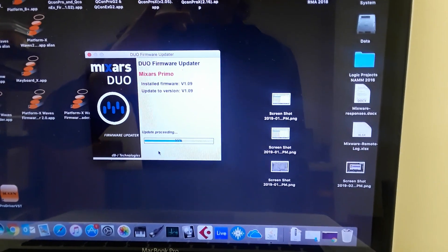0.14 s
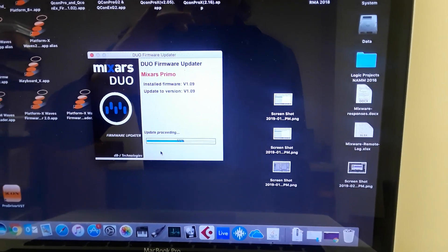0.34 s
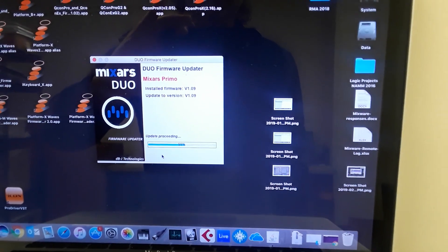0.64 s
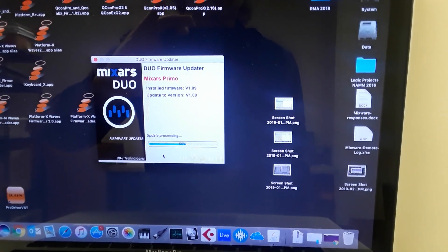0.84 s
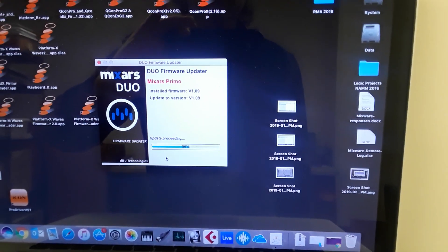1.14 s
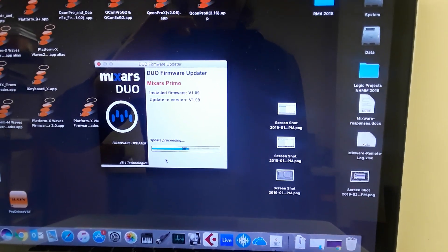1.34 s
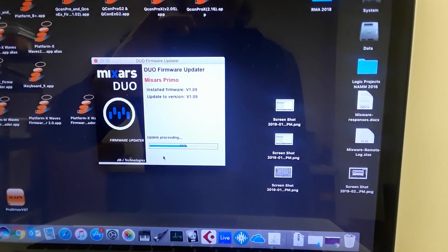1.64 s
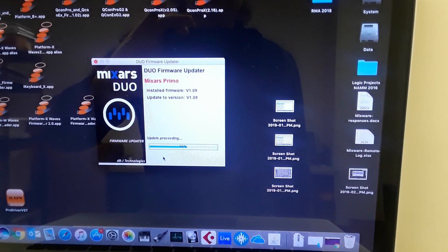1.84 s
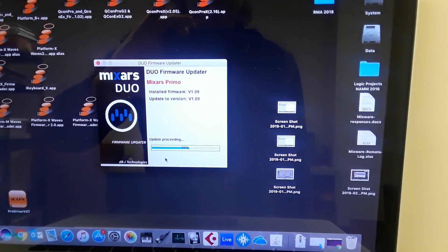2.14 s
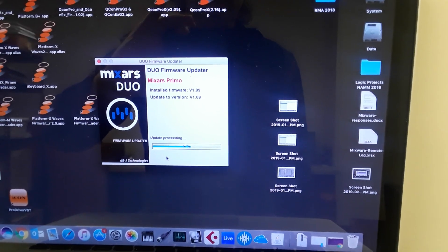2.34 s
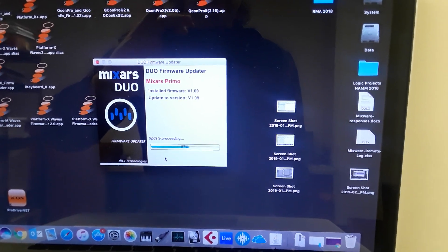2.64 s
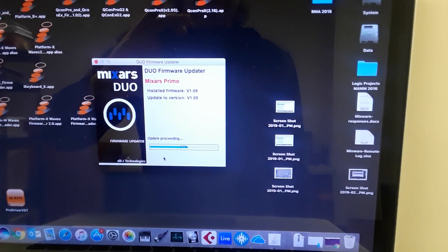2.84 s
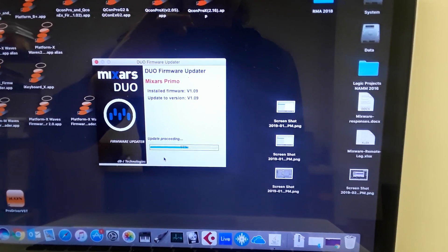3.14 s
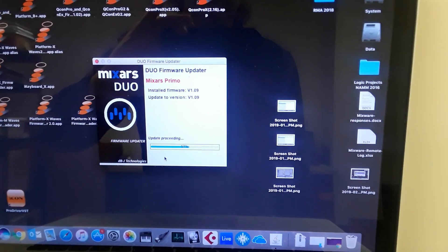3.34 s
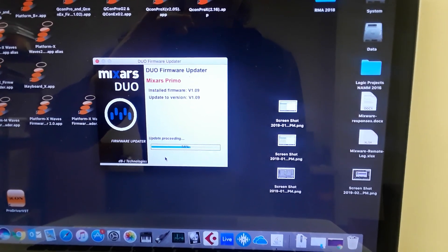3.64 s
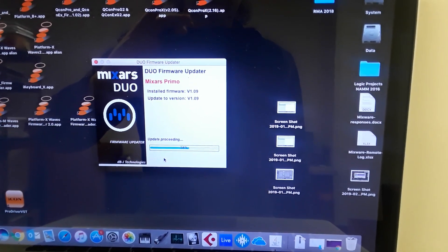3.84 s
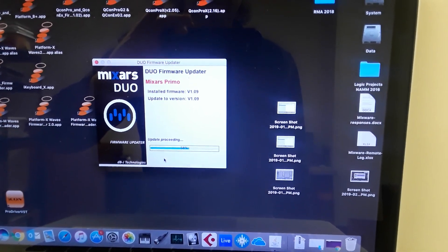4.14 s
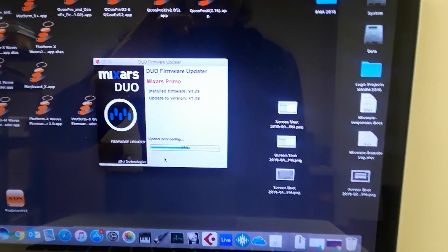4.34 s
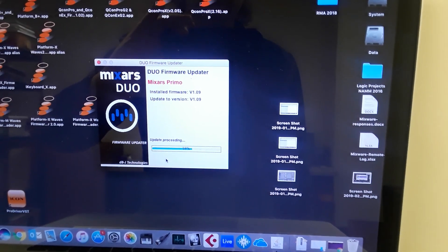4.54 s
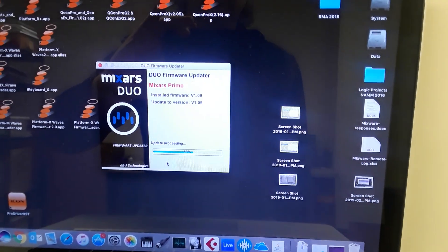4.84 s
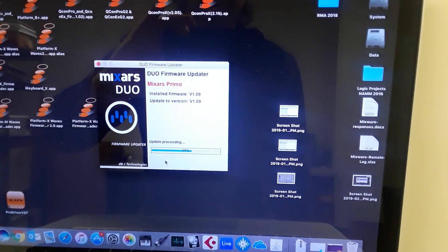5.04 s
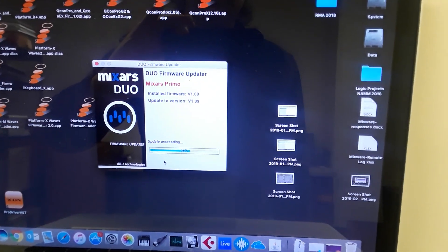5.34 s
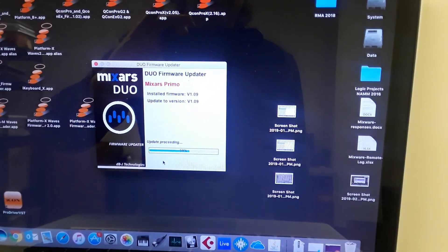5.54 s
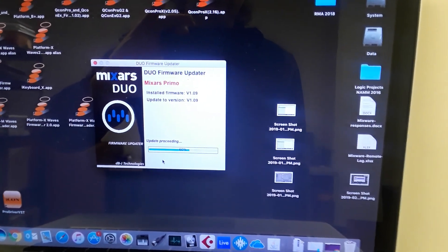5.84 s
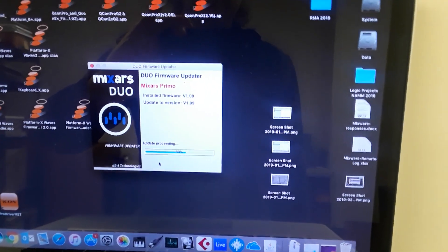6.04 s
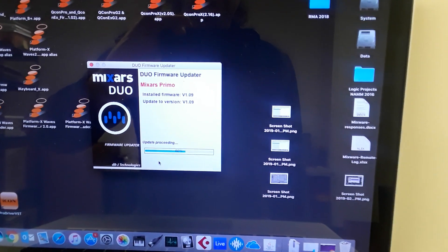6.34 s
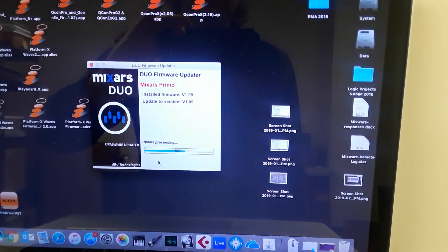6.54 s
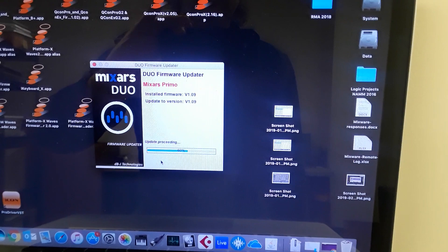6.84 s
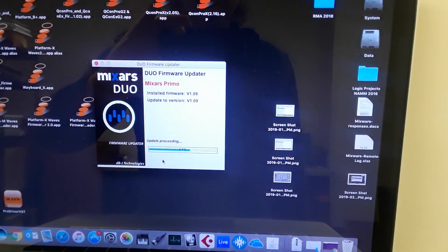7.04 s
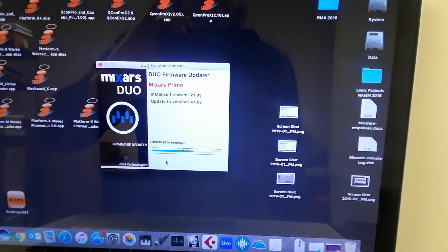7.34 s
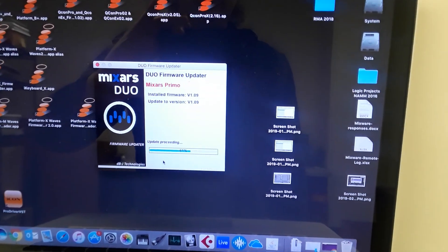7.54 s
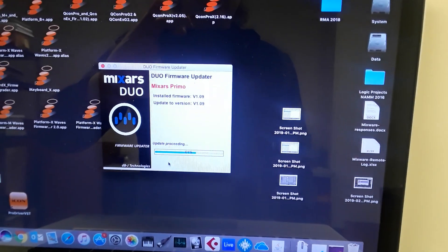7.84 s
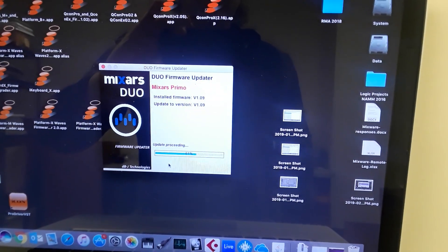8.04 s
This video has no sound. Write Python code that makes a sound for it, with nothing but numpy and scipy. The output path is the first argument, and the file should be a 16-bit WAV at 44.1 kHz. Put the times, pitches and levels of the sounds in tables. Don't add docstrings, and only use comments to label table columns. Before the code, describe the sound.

A quiet office with low ventilation rumble and airy hiss, faint electronic fizz on the right, and a distant heavy engine pulling away at the end.

```python
import sys
import numpy as np
from scipy import signal
from scipy.fft import rfft, irfft, next_fast_len
from scipy.io import wavfile
from scipy.ndimage import uniform_filter1d

SR = 44100
rng = np.random.default_rng(int(sys.argv[2]) if len(sys.argv) > 2 else 0)


def file_out(sig):
    cols = np.atleast_2d(sig).T
    lim = np.clip(cols, -1, 1)
    pcm = np.round(lim * 32767).astype(np.int16)
    wavfile.write(sys.argv[1], SR, pcm)


def level_to_linear(level):
    exponent = np.asarray(level, float) / 20
    return 10 ** exponent


N = 361619
T = np.arange(N) / SR
SIZE = next_fast_len(N)
HZ = np.arange(SIZE // 2 + 1) * SR / SIZE + 1e-3
LAG_S = 0.00015


def on_log(table, column=1):
    table = np.array(table)
    return np.interp(np.log(HZ), np.log(table[:, 0]), table[:, column])


def white():
    return rfft(rng.standard_normal(SIZE)) * np.sqrt(SR / 2)


def walk(rate):
    k = int(SR / rate)
    held = np.repeat(rng.standard_normal(N // k + 1), k)
    return 1.23 * uniform_filter1d(uniform_filter1d(held, k), k)[:N]


def tone(hz, db):
    cycles = np.cumsum(hz + 0 * T) / SR + rng.random()
    return np.sqrt(2) * level_to_linear(db) * np.sin(2 * np.pi * cycles)


def pair(gain_left, gain_right):
    # freq_hz [Hz], likeness [0-1]
    likeness = [(60, 0.97), (130, .98), (220, 0.9), (340, 0.68), (480, 0.23), (730, 0.64), (1000, 0.23),
                (1350, 0.03), (1520, 0.59), (1700, 0.14), (2300, 0.09), (4000, 0.05), (16000, 0)]
    like = np.clip(on_log(likeness), 0, 1)
    shared = np.sqrt(like) * white()
    left = shared * np.exp(-2j * np.pi * HZ * LAG_S) + np.sqrt(1 - like) * white()
    right = shared + np.sqrt(1 - like) * white()
    return np.array([left * gain_left, right * gain_right])


def arrive(x, pan_db):
    left = np.interp(T - LAG_S, T, x)
    return np.array([left * level_to_linear(pan_db / 2), x * level_to_linear(-pan_db / 2)])


def flicker(spectrum, edges, rate, depth_db):
    out = 0
    for lo, hi in zip(edges, edges[1:]):
        band = irfft(spectrum * ((HZ >= lo) & (HZ < hi)), SIZE)[..., :N]
        out = out + band * level_to_linear(depth_db * walk(rate))
    return out


def flow_db():
    # time_s [s], swell_db [dB]
    flow = [(0, -1), (.7, 1), (2.8, 0.7), (4.5, -0.6), (5.6, 0.6), (7.0, 0.7), (8.2, 2.5)]
    db = np.interp(T, *np.transpose(flow))
    return db - db.mean()


def ventilation():
    # freq_hz [Hz], density_db [dB per Hz]
    rumble_table = [(15, -104), (30, -95), (60, -83), (85, -77.5), (105, -73), (120, -68), (140, -74.5),
                    (160, -76), (200, -78), (250, -84.5), (290, -82.5), (320, -93), (350, -90), (420, -99)]
    # pitch_hz [Hz], level_db [dB], lost_db [dB lost by the end]
    blower = [(183.8, -62.5, 8), (264.3, -76, 0.5), (347.2, -80, 3)]
    gain = level_to_linear(on_log(rumble_table)) / (1 + (HZ / 520) ** 6)
    right_gain = gain * level_to_linear(-.8 * (HZ > 230))
    rumble = flicker(pair(gain, right_gain), [0, 70, 110, 160, 240, SR], 6.5, 1.52)
    fading = np.clip((T - 4.2) / 1.2, 0, 1)
    blades = 0
    for hz, db, lost_db in blower:
        blades = blades + tone(hz + .5 * walk(1.97), db - lost_db * fading + 1.9 * walk(4))
    return rumble * level_to_linear(.7 * flow_db()) + arrive(blades, pan_db=-0.5)


def air():
    # freq_hz [Hz], density_db [dB per Hz]
    air_left = [(300, -110), (420, -98), (600, -99), (700, -92), (1000, -99.5), (1300, -93.5),
                (1800, -97.5), (2050, -104), (2700, -111), (4000, -115), (7500, -118), (9500, -120),
                (13000, -118), (16000, -115)]
    # freq_hz [Hz], density_db [dB per Hz]
    air_right = [(300, -110), (450, -99), (600, -99), (700, -93), (1000, -99), (1150, -100), (1320, -104),
                 (1900, -108), (2600, -111), (4500, -116), (7000, -118), (10000, -119), (13000, -112),
                 (16000, -108)]
    # centre_hz [Hz], width_hz [Hz], left_db [dB], right_db [dB]
    housing = [(860, 74, -79.5, -82), (942, 46, -79.5, -85.5), (2690, 150, -88, -99),
               (1521, 128, -67.5, -78), (1764, 54, -75.5, -89), (2290, 240, -76.5, -83.5),
               (3025, 180, -87, -99), (3510, 260, -83.5, -93), (8200, 820, -105, -82),
               (12000, 580, -105, -87)]
    power = [level_to_linear(2 * on_log(table)) * (HZ > 250) for table in (air_left, air_right)]
    for hz, width, *levels_db in housing:
        bell = np.exp(-.5 * ((HZ - hz) / (width / 2)) ** 2)
        bell = bell / (width * np.sqrt(np.pi / 2))
        power = [p + level_to_linear(2 * db) * bell for p, db in zip(power, levels_db)]
    both = pair(*np.sqrt(power))
    mid = flicker(both, [0, 600, 900, 1250, 1650, 2000, 2700], 4.5, 0.52)
    treble = flicker(both, [2700, 4000, 7000, SR], 1.8, 0.86)
    return mid * level_to_linear(0.52 * flow_db()) + treble


def whines(base_hz, orders):
    out = 0
    for k, left_db, right_db in orders:
        whine = tone(k * base_hz + 1.2 * walk(4), 4 * walk(3.5) - 2.5)
        out = out + whine * level_to_linear(np.array([[left_db], [right_db]]))
    return out


def transformer():
    # multiple of 120.04 Hz, left_db [dB], right_db [dB]
    buzz = [(7, -82, -88), (8, -91, -93), (9, -86, -85), (10, -86, -92), (13, -82, -90), (14, -83, -89),
            (15, -87, -96), (20, -93, -99), (23, -101, -104)]
    # multiple of 33.32 Hz, left_db [dB], right_db [dB]
    shaft_orders = [(37, -85, -96), (38, -86, -97), (41, -83, -96), (42, -82, -96), (43, -87, -97),
                    (68, -95, -103)]
    return whines(120.04, buzz) + whines(33.32, shaft_orders)


def screen_leak():
    # freq_hz [Hz], density_db [dB per Hz]
    leak = [(4500, -130), (6000, -118), (7300, -110), (8500, -101), (9100, -102), (9700, -105),
            (11000, -102), (12200, -96.5), (13300, -97.5), (14500, -96), (16000, -99.5)]
    # start_s [s], end_s [s], level_db [dB]
    bursts = [
        (.241, .807, 0),
        (.858, 5.265, 0),
        (5.285, 5.317, -1),
        (5.538, 5.783, 0),
        (5.903, 5.915, -4),
        (6.004, 6.017, -4),
        (6.757, 7.639, 0),
        (7.907, 8.3, 0),
    ]
    refresh_hz, blank_phase_cycles = 59.87, .29
    on = 0
    for start_s, end_s, db in bursts:
        after = np.maximum(T - end_s, 0)
        release = .86 * np.exp(-after / .007) + .14 * np.exp(-after / .04)
        attack = np.clip((T - start_s + .003) / .008, 0, 1)
        on = np.maximum(on, level_to_linear(db) * attack * release)
    gap = (T * refresh_hz - blank_phase_cycles + .5) % 1 - .5
    blanking_db = -4.5 * np.exp(-.5 * (gap / .05) ** 2)
    crackle_db = 1.9 * walk(1100) + .8 * walk(300)
    hiss = flicker(white() * level_to_linear(on_log(leak)), [0, 7000, 9700, 11500, 13500, SR], 500, 2.2)
    right_only = np.array([[0], [1]])
    return on * hiss * level_to_linear(blanking_db + crackle_db - 0.92) * right_only


def engine_note(rows):
    s, hz, db = np.transpose(rows)
    fade = np.clip(np.minimum(T - s[0], s[-1] + .04 - T) / .04, 1e-4, 1)
    return np.interp(T, s, hz), np.interp(T, s, db) + 20 * np.log10(fade)


def through_room(hz, db):
    # centre_hz [Hz], width_hz [Hz], lift_db [dB]
    modes = [(85.5, 12, 8.5), (102.5, 10, 9.5), (121.5, 6.4, 15), (129.5, 4.8, 10.5), (137, 3.8, 11)]
    for mode_hz, width, lift_db in modes:
        db = db + lift_db * np.exp(-.5 * ((hz - mode_hz) / (width / 2)) ** 2)
    return tone(hz, db)


def engine():
    # [effort, dB]
    revs = [
        [(.75, 137, -64), (1.0, 131, -62.5), (1.3, 121.2, -65.5), (1.8, 120, -63.5), (2.16, 130.6, -59.5),
         (2.26, 133, -70)],
        [(2.5, 142, -63), (2.75, 126.8, -62.5), (2.95, 120.2, -64.5), (3.3, 117.9, -67.5), (3.5, 117, -71),
         (3.75, 115, -59), (4.0, 117, -68)],
        [(4.55, 123.3, -75), (4.85, 138, -64.5), (5.03, 143.2, -53), (5.15, 118.5, -65), (5.22, 119, -76)],
    ]
    # ratio to the firing rate, loudest_s [s], spread_s [s], level_db [dB]
    side_orders = [
        (.625, 7.8, .4, -58.5),
        (1.385, 6.92, 0.23, -60.5),
    ]
    out = 0
    for rows in revs:
        hz, db = engine_note(rows)
        out = out + through_room(hz, db + 0.5 * walk(8))

    bite_s, bite_rise_s = 5.08, .16
    climb_from_hz, climb_hz_per_s = 92.6, 14.2
    slip_hz, slip_s = 18.5, .35
    pull_db, nearing_db_per_s = -55.5, 1.5
    since = np.maximum(T - bite_s, 0)
    hz = climb_from_hz + climb_hz_per_s * since - slip_hz * np.exp(-since / slip_s)
    hz = hz * (1 + 0.0051 * walk(15))
    bite = np.clip(since / bite_rise_s, 0, 1)
    out = out + bite * through_room(hz, pull_db + nearing_db_per_s * since + 0.8 * walk(20))
    for ratio, loudest_s, spread_s, db in side_orders:
        swell = np.exp(-.5 * ((T - loudest_s) / spread_s) ** 2)
        out = out + bite * swell * tone(hz * ratio, db + 1.5 * walk(8.8))
    return out


def scene():
    street = arrive(engine(), pan_db=.4 * walk(1.3))
    return ventilation() + air() + transformer() + screen_leak() + street


def roll_off(x):
    return signal.sosfilt(signal.butter(12, 15760, fs=SR, output="sos"), x)


def record(dry):
    stop = np.sin(np.pi / 2 * np.clip((T[-1] - T) / .004, 0, 1))
    return roll_off(dry * stop)


dry = scene()
out = record(dry)
file_out(out)
```